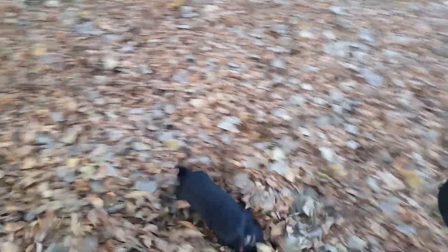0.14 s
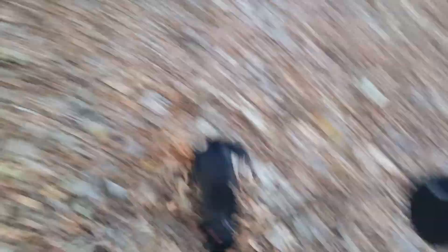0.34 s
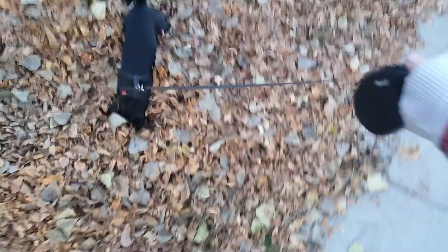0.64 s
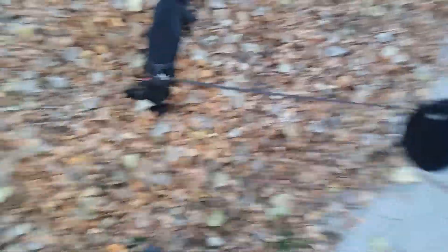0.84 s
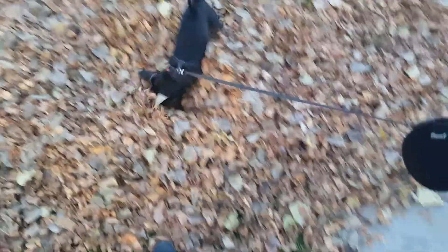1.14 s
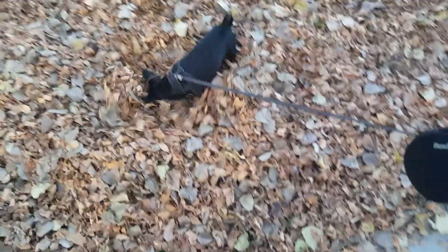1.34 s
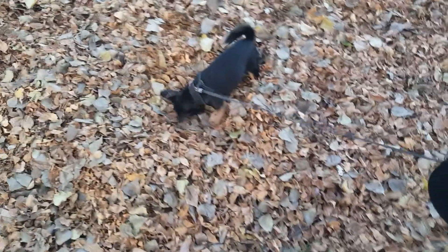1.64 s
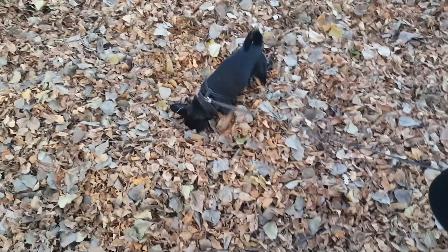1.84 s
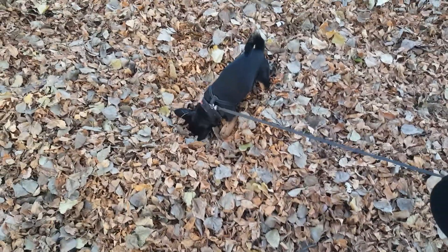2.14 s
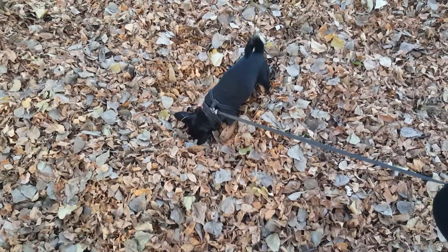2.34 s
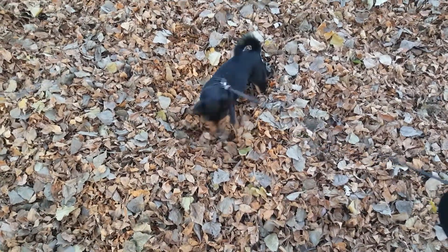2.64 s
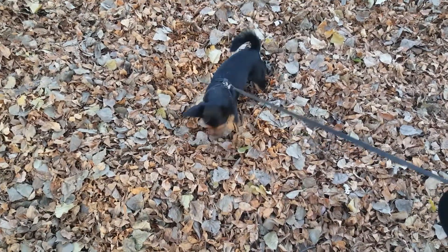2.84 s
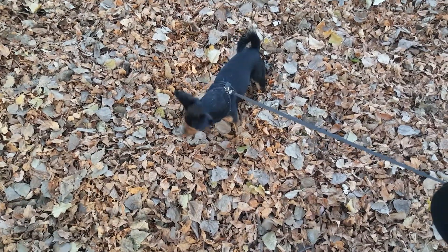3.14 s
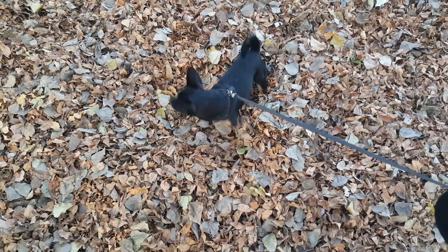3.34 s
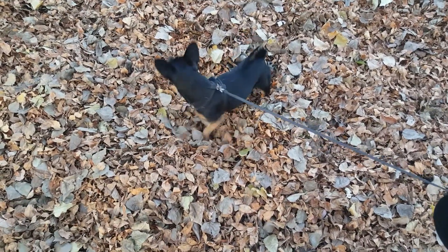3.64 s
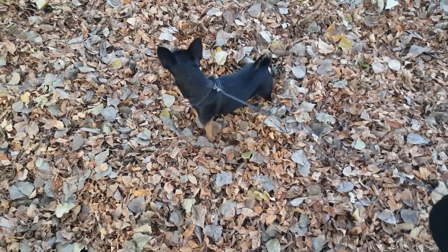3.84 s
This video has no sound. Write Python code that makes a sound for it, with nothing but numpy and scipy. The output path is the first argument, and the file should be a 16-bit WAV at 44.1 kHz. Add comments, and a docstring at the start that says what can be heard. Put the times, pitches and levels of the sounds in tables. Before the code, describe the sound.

Dry leaves crackle densely and loudly as a small dog scuffles, drop away, burst again with dull low knocks, then become small, sparse rustles and snaps; outdoors, close hand-held stereo microphones, faint distant rumble.

```python
"""Small dog in dry leaves

A small dog scuffles through deep dry leaves near hand-held microphones, stops, noses about and turns.
Thousands of filtered clicks make the rustle; short ticks of coloured noise make the single snaps.
Decaying sines make a few low knocks, and shaped noise makes a low distant rumble with faint hiss.
The left microphone sits behind a resonant port, the right one is open."""
import sys
import numpy as np
from scipy import signal
from scipy.fft import rfft, irfft, next_fast_len
from scipy.io import wavfile
from scipy.ndimage import uniform_filter1d

SR = 44100
rng = np.random.default_rng(int(sys.argv[2]) if len(sys.argv) > 2 else 0)


def pcm_store(signal):
    """Save signal as 16-bit PCM."""
    levels = np.round(np.clip(np.atleast_2d(signal), -1, 1) * 32767)
    wavfile.write(sys.argv[1], SR, levels.astype(np.int16).T)


N = 176400  # samples, 4 s
SIZE = next_fast_len(N + 4096)  # FFT length, padded so that filter tails do not wrap round
HZ = np.fft.rfftfreq(SIZE, 1 / SR)


def amp(db):
    """Turn decibels into a linear gain."""
    return 10 ** (np.asarray(db) / 20)


def evened(x):
    """Scale to an RMS of one."""
    return x / np.sqrt(np.mean(x ** 2) + 1e-20)


def read(points, hz):
    """Read a curve of (frequency, value) points, straight along log frequency."""
    f, value = np.transpose(points)
    return np.interp(np.log(hz + 1), np.log(f + 1), value)


def add(mix, start_s, sound):
    """Lay a sound into the mix at a time, cut at the end of the mix."""
    part = mix[round(start_s * SR):][:len(sound)]
    part += sound[:len(part)]


def hump(hz, centre_hz, octaves):
    """Bell-shaped gain around a pitch."""
    return np.exp(-.5 * (np.log2((hz + 1) / centre_hz) / octaves) ** 2)


def causal(db):
    """Minimum-phase filter of the given colour: it rings only after the click."""
    log_gain = np.log(amp(np.concatenate([db, db[-2:0:-1]])))
    return np.exp(np.conj(signal.hilbert(log_gain)))[:len(db)]


def drift(seconds, count):
    """Slow random curves of unit RMS: noise smoothed twice."""
    width = round(seconds * SR)
    noise = rng.standard_normal((count, N))
    return evened(uniform_filter1d(uniform_filter1d(noise, width), width))


BANDS_HZ = np.geomspace(250, 16000, 45)  # centres of the leaf resonances
BELL_OCT = 0.26
LOW_HZ, TREBLE_HZ, UPPER_HZ = 1100, 4100, 6700  # edges of the tilt regions
PEAK_CRACKS_PER_S = 3200  # in each band, at the hardest movement
RATE_SHARE = .25  # dB of crack rate per dB of movement
SPREAD_DB = 2.5  # scatter of crack loudness
CLUMP_DB, CLUMP_S = 0.5, 0.0064  # quick unevenness shared by all bands
PATCHY_DB, PATCHY_S = 1.1, .04  # slower unevenness, separate for each five neighbouring bands
LAG_S, LAG_SPREAD_S = .00004, .00009  # delay of the left side: middle, and reach to either side
RUSTLE_DB = -9
# the dog's movement in the leaves: (time [s], level before trim [dB], then the tilts against
# that level, each taken from its own median: low mids [dB], lower treble [dB], upper treble [dB])
MOVEMENT = [(0.0, -21.5, -16, -3, -6.5), (0.028, -18.5, -15, -2.5, -5.5), (0.098, -20, -16.5, -1.5, -8.5),
            (0.112, -23, -13.5, 0, -3.5), (0.208, -19.5, -13.5, 0.5, -4.5), (0.22, -24.5, -12, 3, -2),
            (0.276, -20.5, -18, -0.5, -8), (0.28, -21, -16.5, -1, -6), (0.358, -25.5, -15.5, 1.5, -2.5),
            (0.454, -21.5, -15.5, 0, -3.5), (0.542, -20.5, -17.5, -3.5, -8), (0.552, -24.5, -10, -4, -3),
            (0.564, -22, -17, -6, -6.5), (0.616, -28, -14.5, -3, -3.5), (0.804, -36.5, -11, -2.5, -3),
            (0.864, -30, -14, -6, -6.5), (0.972, -40.5, -14.5, -4.5, -3.5), (1.12, -42.5, -17, -3.5, -6.5),
            (1.135, -37, -14, -1, -5), (1.227, -25, -17, -1.5, -5), (1.269, -25, -11, -6, -6.5),
            (1.319, -22, -19, -5, -7), (1.357, -25.5, -12, -1.5, -6.5), (1.369, -28, -24, -5, -4.5),
            (1.375, -31, -13.5, -1.5, 0), (1.427, -28, -14.5, -3.5, -5), (1.637, -42, -12.5, -3, -3.5),
            (1.803, -40, -13, -3, -4), (1.9, -48, -18, -8.5, -7.5), (1.96, -50, -17, -6, -7),
            (2.08, -52.5, -15, -3, -6.5), (2.174, -71, 7, -5, 2.5), (2.322, -55.5, -7, 0, -4),
            (2.36, -71, 8, 9, 3), (2.418, -51, -11, -2, -1.5), (2.44, -59, -2, -9, -4),
            (2.465, -52, -10, -6, -4), (2.471, -47, -25, -7, -11), (2.495, -35, -16, -13, -6.5),
            (2.567, -43, -12, -0.5, -2), (2.661, -30, -17, -4.5, -4), (2.667, -27, -21, -10, -8),
            (2.679, -33.5, -15, -2.5, -2.5), (2.751, -44.5, -12, -0.5, -5.5), (2.809, -42.5, -17, -4, -6),
            (2.853, -52.5, -6, 1, -1), (2.869, -44.5, -19.5, -4, -8), (2.93, -57, -18, -4, -7),
            (2.99, -56, -8, -6, -6), (3.174, -58.5, -14, -6, -9), (3.296, -69.5, 1, -8, -2),
            (3.418, -56, -14, -17.5, -11), (3.44, -62, 0, -5, -2), (3.48, -50, -11, -10, -12),
            (3.524, -43, -23, -6, -9.5), (3.582, -45.5, -9, -6, -5), (3.594, -39.5, -14, -4.5, -6.5),
            (3.68, -38, -11, -3, -1), (3.704, -33.5, -15.5, -2, 0), (3.736, -39, -16, -4, -5.5),
            (3.826, -43, -16.5, -6, -3), (3.854, -47.5, -9, -3, -4), (3.86, -36.5, -29, -13, -7.5),
            (3.872, -48, -11, -4, -3), (3.996, -50, -12, -5, -6), (4.0, -54, -14, -4, -4)]
# colour of the dry leaves: (frequency [Hz], gain [dB])
LEAF_COLOUR = [(100, -14), (250, 6), (500, 7), (1400, 9), (2300, 11.5), (2900, 12.5), (3400, 13),
               (4500, 10), (5600, 8.5), (6500, 6.5), (9700, 12.5), (10600, 6.5), (12500, 8.5), (14000, 4.5),
               (15700, 2.5)]


def rustle():
    """Leaves of many sizes crackle from five directions; harder movement gives more and louder cracks."""
    s, level, low, treble, upper = np.transpose(MOVEMENT)
    t = np.arange(N) / SR
    level_db = np.interp(t, s, level)
    rate_gain = amp(RATE_SHARE * (level_db - level.max()))
    chance_of_crack = PEAK_CRACKS_PER_S * rate_gain / SR
    clump_db = CLUMP_DB * drift(CLUMP_S, count=1) + PATCHY_DB * drift(PATCHY_S, count=9)

    bells = hump(HZ, BANDS_HZ[:, None], BELL_OCT)
    bells /= np.linalg.norm(bells, axis=0) + 1e-9  # the bands sum to even power
    sides = np.tile([0, 1, -.5, .5, -1], 9)
    out = np.zeros((2, len(HZ)), complex)
    for k, (centre, bell, side) in enumerate(zip(BANDS_HZ, bells, sides)):
        if centre > UPPER_HZ:
            tilt = upper
        elif centre > TREBLE_HZ:
            tilt = treble
        elif centre < LOW_HZ:
            tilt = low
        else:
            tilt = 0 * low
        tilt_db = np.interp(t, s, tilt - np.median(tilt))
        # offset the crack rate, so the total follows the level
        shape = amp(level_db + tilt_db + clump_db[k // 5]) / np.sqrt(rate_gain)

        chance, size, sign = rng.random((3, N))
        loudness = amp(-SPREAD_DB * np.log(size + 0.003))  # mostly soft, a few much louder
        cracks = (chance < chance_of_crack) * loudness * np.sign(sign - .5)
        cracks /= np.sqrt(np.mean(cracks[:SR // 2] ** 2))
        right = rfft(shape * cracks, SIZE) * bell
        left = right * np.exp(-2j * np.pi * HZ * (LAG_S + side * LAG_SPREAD_S))
        out += [left, right]
    return amp(RUSTLE_DB) * irfft(out * amp(read(LEAF_COLOUR, HZ)), SIZE)[:, :N]


AIR_DB = -49.5  # RMS
SWELL_DB, PATCH_DB = -0.4, 1.5
# colour of rumble and hiss: (frequency [Hz], relative density [dB per Hz])
AIR_COLOUR = [(22, -45), (45, -10), (70, -3.5), (100, -0.5), (150, -6), (250, -15), (500, -20.5),
              (1000, -25), (2300, -33.5), (5000, -38), (10000, -45), (16000, -38)]
# left-right likeness of rumble and hiss: (frequency [Hz], shared part [0 to 1])
LIKENESS = [(30, .7), (80, .9), (150, .94), (300, .9), (800, .6), (2000, .3), (5000, .05)]


def air():
    """Distant rumble and faint hiss: noise shaped by colour, with slow swell and drifting patches."""
    frames, hz = N // 512 + 5, np.fft.rfftfreq(2048, 1 / SR)
    a, b, c, d, patches = rng.standard_normal((frames, 1025, 5)).T
    patches = uniform_filter1d(patches, 16, 0)  # across frequency
    patches = evened(uniform_filter1d(patches, 8, 1))  # across time
    swell = evened(uniform_filter1d(rng.standard_normal(frames), 25))

    same = read(LIKENESS, hz)[:, None]
    left = a + 1j * b
    right = same * left + np.sqrt(1 - same ** 2) * (c + 1j * d)
    gain_db = read(AIR_COLOUR, hz)[:, None] + PATCH_DB * patches + SWELL_DB * swell
    sound = signal.istft(np.array([left, right]) * amp(gain_db), nperseg=2048, noverlap=1536)[1]
    return amp(AIR_DB) * evened(sound[:, :N])


SNAP_T60_S, SNAP_DB = .012, -22  # decay by 60 dB, trim
# single snapping leaves: (time [s], level before trim [dB], pitch [Hz], width [octaves])
LEAF_SNAPS = [(1.136, -23, 7000, 0.94), (1.221, -14, 3000, 0.22), (1.2625, -17, 2500, 0.65),
              (1.366, -14, 2670, 0.32), (1.856, -35, 5000, 1.2), (2.278, -38.5, 3000, 3.9),
              (2.3742, -41, 1290, 0.4), (2.375, -37, 12000, 0.49), (2.390, -48, 4000, .9),
              (2.401, -37, 9000, .9), (2.417, -42, 7000, 1.1), (2.456, -37, 4000, 1.4),
              (2.648, -26, 2980, 0.96), (2.666, -23, 1870, 0.26), (2.698, -26.5, 3000, 1.6),
              (3.088, -31.5, 4460, 0.13), (3.157, -34, 7000, 2.4), (3.169, -37.5, 4460, 1.8),
              (3.181, -48, 3000, 1.2), (3.194, -42, 2500, 0.49), (3.219, -39, 11000, 0.98),
              (3.289, -53, 5000, .4), (3.370, -45, 8000, .6), (3.406, -43, 2980, .9),
              (3.4605, -33, 5000, 0.93), (3.857, -33, 9000, 1.2), (3.95, -33, 9000, 1.1)]


def snaps():
    """Each snap is a tick of noise that dies at once, coloured around its pitch."""
    out, t = np.zeros(N), np.arange(1024) / SR
    hz = np.fft.rfftfreq(1024, 1 / SR)
    for s, db, pitch_hz, width in LEAF_SNAPS:
        noise = rng.standard_normal(1024)
        coloured = irfft(rfft(noise) * hump(hz, pitch_hz, width))
        tick = coloured * amp(-60 * t / SNAP_T60_S)
        add(out, s, amp(db + SNAP_DB) * evened(tick))
    return out


# low knocks, each starting 1.2 ms ahead of its time: (time [s], level [dB])
LOW_KNOCKS = [(1.253, -30.5), (1.263, -16.5), (1.272, -25), (1.288, -19.5), (1.309, -21.5), (1.339, -25.5)]
# ringing of one knock: (frequency [Hz], level [dB], decay by 60 dB [s])
KNOCK_RING = [(180, -1.5, 0.023), (273, -12, 0.026), (404, -14, .035)]


def knocks():
    """Dull quick knocks, as of a taut leash jolting its handle: a few low sines that die fast."""
    out, t = np.zeros(N), np.arange(3000) / SR
    ring = sum(amp(db - 60 * t / t60) * np.sin(2 * np.pi * hz * t) for hz, db, t60 in KNOCK_RING)
    ring = signal.lfilter(*signal.butter(2, 90, "high", fs=SR), ring)
    for s, db in LOW_KNOCKS:
        add(out, s - .0012, amp(db) * ring)
    return out


def scene():
    """Rustle and air in stereo, snaps and knocks alike on both sides."""
    return rustle() + snaps() + knocks() + air()


CUT_HZ, EDGE_HZ = 48, 15730  # bass cut, upper band limit
ROOF = 1.3  # ceiling that the peaks bend towards
# resonance of the left port against the open right side: (frequency [Hz], gain [dB])
LEFT_PORT = [(300, .3), (800, 2.5), (1300, 5.6), (1800, 13.2), (2300, 15.8), (2900, 11), (3250, 3.5),
             (3600, 2.5), (4000, 6.4), (4900, 9.9), (6000, 8.7), (6700, .4), (8300, 4.2), (9500, -5.8),
             (10500, -6.3), (11500, -.4), (12600, 7.4), (14000, 2.9), (15500, -3.4)]


def record(dry):
    """The left port rings, the bass is cut, peaks round off, then the band limit."""
    left = irfft(rfft(dry[0], SIZE) * causal(read(LEFT_PORT, HZ)), SIZE)[:N]
    bass_cut = signal.butter(2, CUT_HZ, "high", fs=SR, output="sos")
    cut = signal.sosfilt(bass_cut, [left, dry[1]])
    rounded = ROOF * np.tanh(cut / ROOF)
    band_limit = signal.firwin(1535, EDGE_HZ, window=("kaiser", 9), fs=SR)
    return signal.oaconvolve(rounded, band_limit[None], "same")


dry = scene()
out = record(dry)
pcm_store(out)
```